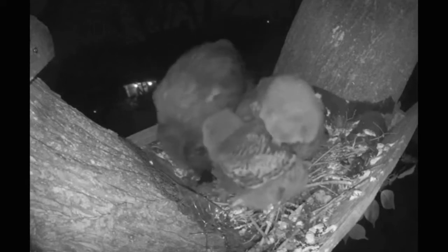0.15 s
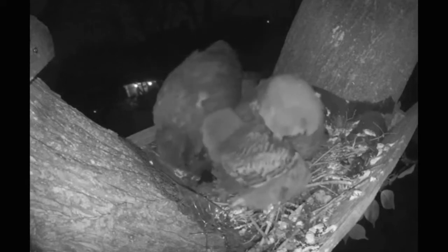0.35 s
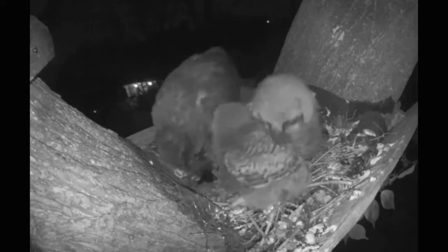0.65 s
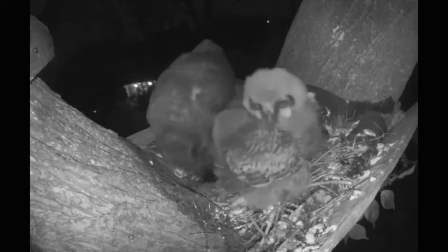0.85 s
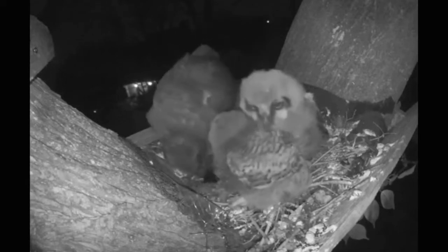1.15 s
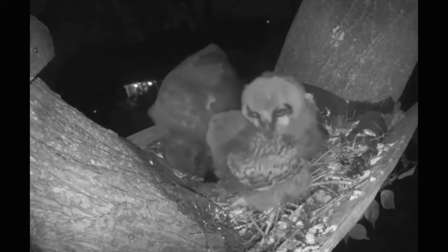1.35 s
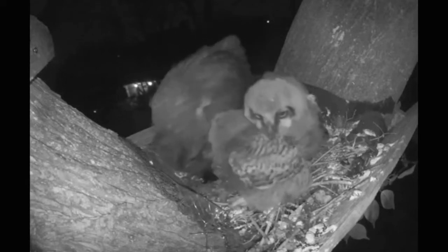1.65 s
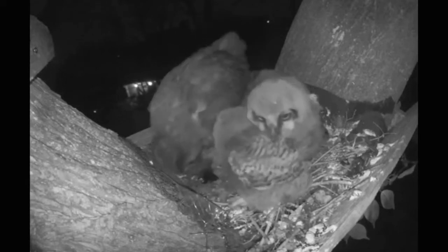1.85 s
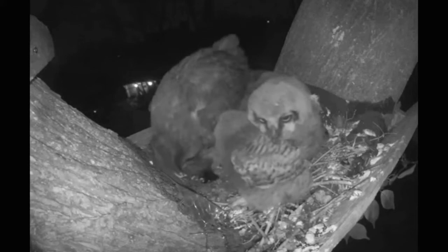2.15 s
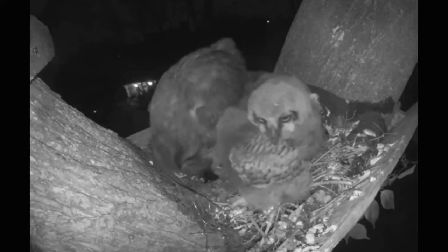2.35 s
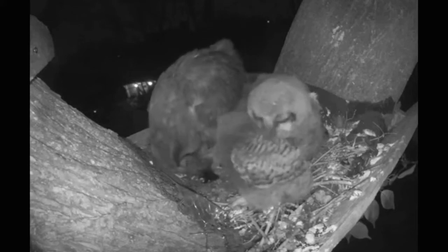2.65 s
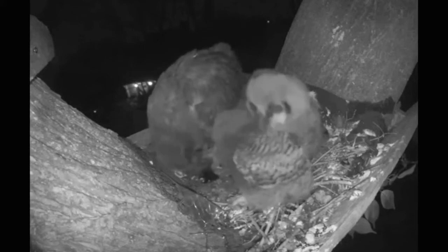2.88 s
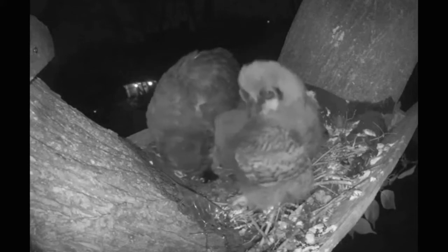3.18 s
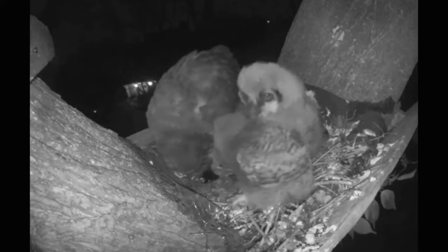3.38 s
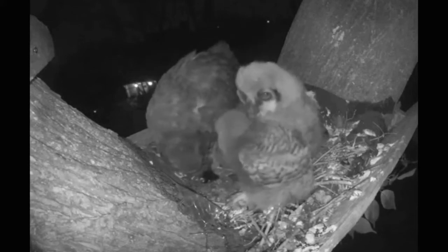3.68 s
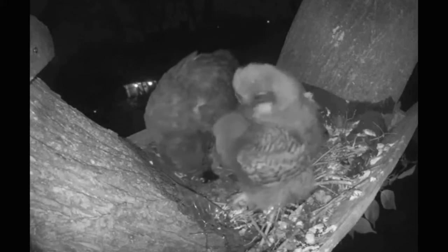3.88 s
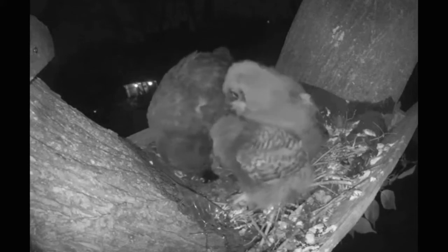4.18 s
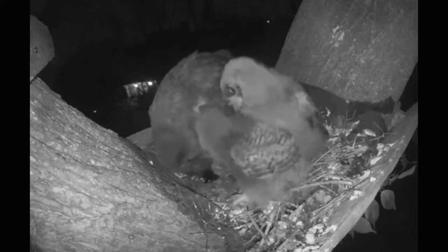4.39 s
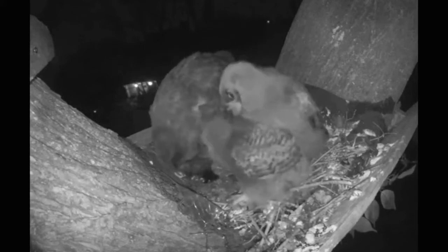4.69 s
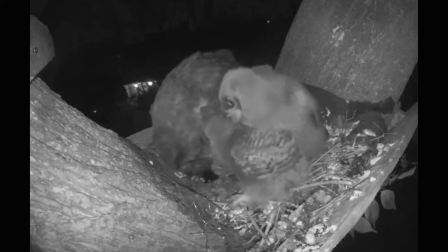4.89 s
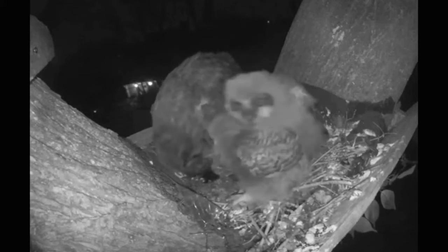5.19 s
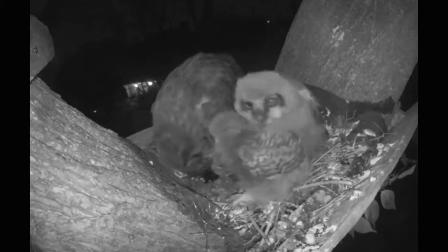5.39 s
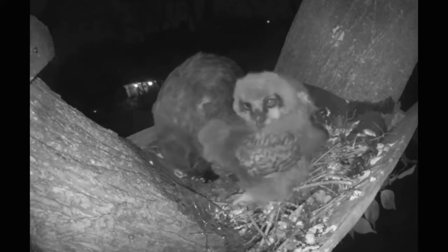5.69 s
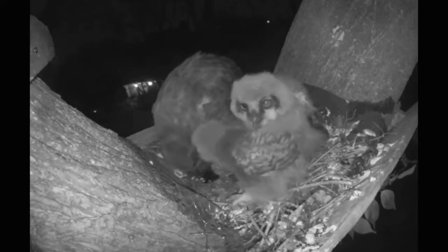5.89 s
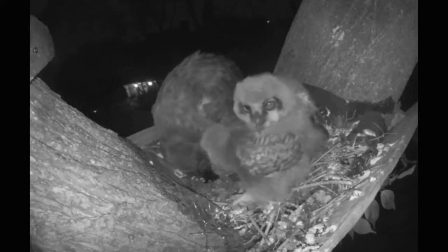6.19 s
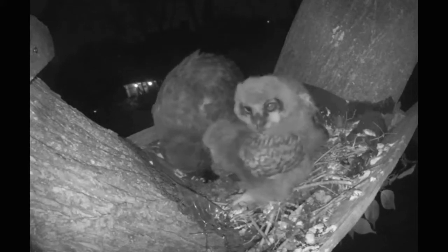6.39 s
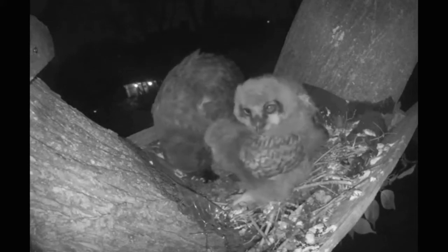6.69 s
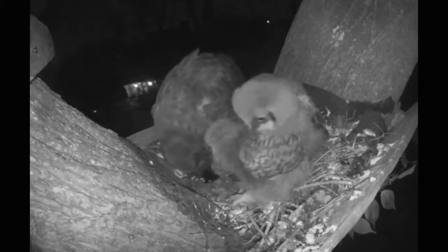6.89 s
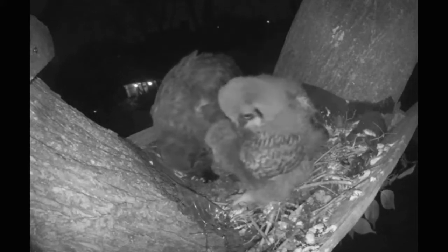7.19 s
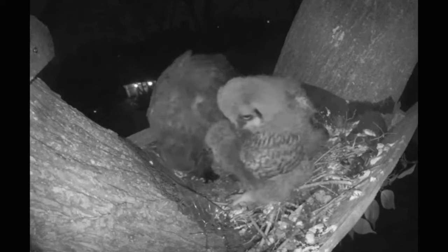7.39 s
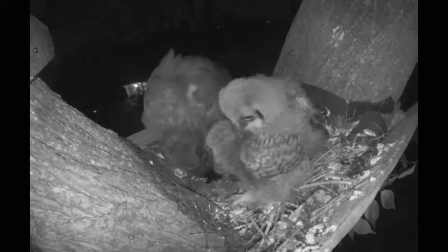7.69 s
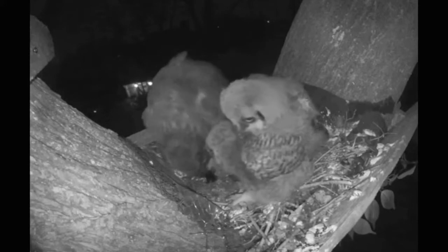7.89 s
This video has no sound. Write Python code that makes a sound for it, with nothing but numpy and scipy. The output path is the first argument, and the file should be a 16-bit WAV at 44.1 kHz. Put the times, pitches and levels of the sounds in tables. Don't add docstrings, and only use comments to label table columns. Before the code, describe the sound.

Owlets beg at night beside a small microphone with little bass. Dull knocks open the scene, followed by dry crackling and a hoarse rising screech. Soft fluttering hoots from an adult surround a shorter, squealing second screech. Several hard nest blows come before a gasp and a third, open, rasping screech. Then it settles into quiet hum, with distant metallic tube tones, slight rustles and last soft thumps.

```python
import sys
import numpy as np
from scipy import signal
from scipy.io import wavfile
from scipy.ndimage import uniform_filter1d

SR = 44100
rng = np.random.default_rng(int(sys.argv[2]) if len(sys.argv) > 2 else 0)


def rack_gain(trim_db):
    fader = np.asarray(trim_db, float)
    return 10 ** (fader / 20)


def waveform_to_disk(signal):
    frames = np.transpose(np.atleast_2d(signal))
    scaled = np.clip(frames, -1, 1) * 32767
    samples = np.round(scaled).astype(np.int16)
    wavfile.write(sys.argv[1], SR, samples)


N = 354960

# f/Hz, level/dB per Hz
NIGHT_SPECTRUM = [(59, -57), (100, -42), (140, -58.5), (228, -16), (372, -1), (422, 0), (658, -1.5),
                  (731, -5.5), (943, -7.5), (1900, -24), (2780, -19), (2960, -20.5), (4060, -21),
                  (6340, -41.5), (15800, -52.5)]
# t/s, level/dB
HUM_SWELL = [(0.3, -63.5), (0.62, -66), (5.28, -65), (5.77, -67.5), (8.04, -62)]
# t/s, f/Hz, level/dB, t60/s
TUBE_PARTIALS = [(2.45, 1860, -87.5, 1.8), (3.25, 1448, -81.5, 4), (3.25, 5626, -77, .4),
                 (3.25, 5071, -79, .4), (3.25, 4269, -81, .5), (3.25, 2729, -83, .8),
                 (4.456, 2386, -74, .9), (4.62, 2745, -79, .7), (4.455, 928, -71, 9),
                 (4.456, 2408, -62, 0.84), (4.62, 2722, -70.5, 0.69), (3.78, 3360, -81, 0.45),
                 (2.89, 3330, -80, 0.54), (2.47, 3330, -79, .6), (5.12, 1835, -83.5, 1.5),
                 (5.723, 2720, -71.5, 0.83), (5.722, 2742, -79, .9), (7.665, 2420, -73, 0.5),
                 (7.665, 2398, -78, .5)]
# peak t/s, peak level/dB, ring f/Hz, width/s
BLOWS = [(.016, -37, 419, .0051), (.0276, -34.5, 481, .0029), (.0607, -28.5, 533, .0028),
         (.0712, -20, 527, .0029), (.0941, -40.5, 405, .0087), (.125, -37.5, 430, .0067),
         (.132, -36.5, 487, .0021), (.1654, -37.5, 425, .0029), (1.138, -41, 450, .0035),
         (1.15, -46, 300, .012), (1.161, -43, 480, .007), (2.388, -37, 560, .0027),
         (2.3943, -25.5, 409, .0044), (2.4145, -29.5, 467, .0033), (2.4432, -34.5, 419, .004),
         (2.4694, -38, 485, .0047), (5.0323, -22.5, 523, .0028), (5.038, -31, 480, .003),
         (5.056, -42, 450, .004), (5.101, -37, 350, .004), (5.123, -40, 350, .004),
         (5.044, -25.5, 414, .0029), (5.067, -23, 427, .005), (5.082, -32, 473, .0049),
         (5.0915, -27, 390, .0046), (5.1155, -34, 470, .0056), (7.8164, -36, 423, .0038),
         (7.828, -35.6, 427, .0039)]
# t/s, peak level/dB, ring f/Hz
LONE_STEPS = [(.1502, -42, 393), (.2124, -46, 483), (.291, -45.5, 426), (.42, -51, 552),
              (.6515, -42.7, 416), (.713, -52, 340), (1.218, -43, 330), (2.069, -51, 598),
              (2.3445, -43.5, 441), (2.523, -52.5, 270), (5.442, -49, 400), (7.575, -52, 346),
              (7.879, -48.5, 414)]
# start t/s, end t/s, peak level/dB
FOOT_SHUFFLES = [
    (0, .058, -41),
    (.078, .12, -43),
    (2.35, 2.385, -46),
    (2.4, 2.5, -47),
    (5.02, 5.125, -44),
    (5.49, 5.545, -52),
    (7.795, 7.815, -49),
]
# t/s, peak level/dB, centre f/Hz
TWIG_SNAPS = [(.0695, -47, 2200), (1.514, -58, 5200), (2.39, -60, 2700), (2.858, -63, 4700),
              (3.24, -60, 3100), (4.737, -58, 3300), (.3601, -58, 2800), (.483, -57, 2640),
              (1.1262, -51, 4110), (1.1596, -52, 3860), (1.1942, -53, 2900), (1.2254, -52, 3200),
              (1.259, -54, 2400), (1.283, -53, 3180), (1.4905, -55, 5500), (1.0007, -52, 3820),
              (1.037, -56, 3600), (1.135, -51, 4600), (1.186, -54, 3000), (1.208, -53, 4400),
              (1.2496, -53, 4860), (1.3739, -53, 4200), (1.4088, -57, 4390), (1.4687, -60, 4720),
              (1.33, -59, 5200), (1.443, -62, 4500), (6.1772, -52, 3800), (6.171, -56, 3900),
              (6.2, -58, 3500), (6.215, -60, 3800), (6.249, -54, 4000), (6.244, -58, 4700),
              (2.0663, -54, 2720), (2.7422, -62, 3980), (2.9801, -58, 2870), (3.1722, -61, 3010),
              (3.5226, -56, 3220), (3.622, -47.5, 2100), (3.6631, -54, 3640), (4.5194, -52.5, 2410),
              (4.7173, -56, 3420), (4.984, -53, 4500), (5.0112, -52, 3290), (5.0223, -53.5, 4490),
              (6.8877, -58, 3860)]
# start t/s, end t/s, centre f/Hz, level/dB
FEATHER_RUSTLES = [(.96, 1.086, 3600, -71.5), (1.085, 1.25, 3900, -68.5), (1.244, 1.348, 3930, -70),
                   (1.361, 1.505, 4100, -78), (2.96, 3.09, 3750, -77), (3.22, 3.34, 4220, -78),
                   (4.488, 4.573, 4500, -77.5), (4.692, 4.763, 3620, -68.5), (4.8, 4.866, 3760, -76),
                   (7.918, 8.04, 3550, -72.5), (3.78, 3.874, 3800, -75), (4.188, 4.25, 4040, -80.5),
                   (0, 8.04, 4400, -86.5)]
# start t/s, end t/s, f/Hz, fundamental level/dB
HOOT_PULSES = [(2.78, 2.865, 304, -48), (2.862, 2.898, 240, -76), (3.116, 3.187, 294.8, -52.5),
               (3.183, 3.203, 263, -76), (3.205, 3.279, 300.7, -50), (3.271, 3.349, 292, -52.5),
               (3.338, 3.394, 276.6, -55), (3.389, 3.462, 268.8, -57.5), (3.452, 3.506, 249, -69),
               (4.284, 4.312, 255, -68), (4.31, 4.346, 268, -57), (4.335, 4.411, 290, -51.5),
               (4.402, 4.479, 295.3, -51), (4.473, 4.546, 276.6, -53), (4.541, 4.611, 264.7, -58),
               (4.615, 4.672, 247.4, -70), (5.125, 5.19, 303, -54), (5.17, 5.24, 290, -55),
               (5.237, 5.305, 272, -56)]
# start t/s, end t/s, first f/Hz, last f/Hz, level/dB
NARROW_WHEEZES = [
    (.275, .364, 6500, 6270, -81.5),
    (.361, .516, 2750, 2780, -71.5),
    (.361, .512, 3560, 3580, -73),
    (.48, .52, 4830, 4500, -79),
    (.666, .69, 5600, 4700, -79),
    (6.145, 6.21, 5100, 6900, -77),
    (6.19, 6.25, 5800, 5000, -78),
    (3.868, 3.898, 5300, 5200, -63),
    (3.87, 3.905, 6100, 6100, -69),
    (4.613, 4.66, 5320, 5370, -78),
]
# start t/s, end t/s, first f/Hz, last f/Hz, level/dB
OPEN_GASPS = [
    (.278, .33, 4350, 4600, -74.5),
    (6.125, 6.19, 3200, 4000, -67),
    (6.19, 6.26, 3670, 4020, -77),
]
# start t/s, length/s, first f/Hz, last f/Hz, level/dB
SHORT_PEEPS = [(3.867, .03, 2980, 3180, -35.5), (3.83, .024, 1080, 1200, -50),
               (6.258, .026, 2850, 2930, -55), (6.212, .024, 5750, 5480, -70),
               (6.222, .04, 6800, 6800, -79), (6.184, .018, 6050, 5600, -72), (.25, .014, 3850, 3550, -62),
               (.264, .014, 3550, 3350, -67), (1.507, .01, 2600, 2900, -55), (1.513, .01, 3300, 3700, -50),
               (.681, .016, 4200, 3550, -57), (1.515, .125, 3560, 3670, -56)]
# t/s, f/Hz, level/dB
WHISTLES = [
    [(3.929, 2893, -40), (3.95, 2790, -43), (4.02, 2806, -41), (4.045, 2717, -42.5), (4.06, 2740, -36),
     (4.082, 2790, -31), (4.108, 2730, -37), (4.115, 2800, -47), (4.13, 2900, -50)],
    [(3.94, 3400, -52), (3.955, 3520, -46), (3.98, 3480, -48), (4.0, 3400, -52)],
    [(.5, 4840, -83), (.55, 3990, -73), (.58, 3750, -74), (.615, 4150, -74), (.635, 3750, -72),
     (.68, 3780, -72)],
    [(4.03, 3750, -43), (4.065, 3530, -41), (4.098, 3610, -41), (4.118, 3844, -38), (4.14, 3810, -40),
     (4.155, 3400, -42), (4.17, 2650, -46), (4.19, 1950, -62)],
    [(3.93, 5600, -62), (4.02, 5560, -60), (4.09, 5450, -54), (4.135, 5400, -58)],
    [(1.6, 3600, -52), (1.65, 3850, -43), (1.7, 3700, -44), (1.76, 3700, -45), (1.8, 3800, -38),
     (1.84, 3850, -35)],
    [(6.41, 4000, -50), (6.44, 4000, -44), (6.49, 3900, -43), (6.51, 3950, -38), (6.55, 3950, -38),
     (6.575, 4050, -33)],
]
# t/s, f/Hz, level/dB
HOARSE_BANDS = [
    [(1.6, 2850, -52), (1.65, 2800, -44), (1.75, 2800, -48), (1.85, 2850, -37), (1.872, 2700, -39),
     (1.895, 2400, -60)],
    [(4.015, 3150, -44), (4.05, 3050, -41), (4.08, 3000, -43), (4.11, 3120, -41), (4.15, 3150, -44),
     (4.162, 2700, -52)],
    [(3.903, 3700, -56), (3.92, 3880, -52), (3.94, 3850, -54), (3.98, 3850, -54), (4.025, 3900, -48)],
    [(3.895, 3000, -52), (3.915, 3080, -51), (3.93, 3100, -48), (3.95, 3150, -50)],
    [(6.272, 4200, -63), (6.29, 4400, -57), (6.32, 4000, -53), (6.36, 3800, -51), (6.4, 3850, -49)],
    [(6.123, 3650, -64), (6.135, 3760, -52), (6.143, 3800, -59), (6.15, 3720, -56), (6.163, 3580, -62),
     (6.184, 3550, -66)],
    [(6.3, 2750, -62), (6.35, 2750, -55), (6.41, 2800, -57), (6.44, 2900, -48), (6.46, 2850, -52)],
]
JITTERS = [18, 110, 110, 18, 120, 200, 150, 150, 90, 120, 80, 160, 90, 150]
# top t/s, top f/Hz, level/dB, lead-in/s, jitter/Hz
END_YELPS = [
    (1.853, 3900, -25.5, .012, 35),
    (6.597, 4050, -25.5, .022, 110),
    (4.158, 5300, -53, .02, 130),
]
# t/s, level/dB
EFFORTS = [
    [(1.508, -63), (1.55, -55), (1.64, -40), (1.70, -38), (1.76, -37), (1.80, -32.5), (1.86, -30.5),
     (1.88, -41), (1.905, -78)],
    [(3.864, -56), (3.88, -52), (3.94, -52.5), (4.03, -39), (4.08, -35.5), (4.15, -36), (4.168, -42),
     (4.192, -72)],
    [(6.262, -70), (6.275, -55.5), (6.35, -47.5), (6.405, -45), (6.435, -40.5), (6.56, -34), (6.6, -33),
     (6.622, -43), (6.65, -70)],
]
# f/Hz, level/dB per Hz
THROAT_SPECTRA = [
    [(120, -72), (200, -35), (278, -23), (316, -25), (423, -15.5), (610, -18.5), (1180, -22), (1790, -32),
     (2780, -3.5), (3650, 1.5), (5260, -14.5), (6090, -47), (7720, -31.5), (11300, -53.5), (15800, -41.5)],
    [(120, -76), (200, -50), (328, -28), (527, -14.5), (980, -30.5), (1960, -25), (2580, -18.5), (2780, -1),
     (3330, -7.5), (3650, -11), (4980, -19), (5660, -19), (6430, -43), (12400, -47), (15800, -48)],
    [(120, -74.5), (200, -45), (359, -21.5), (577, -11), (621, -20), (1180, -21.5), (1660, -37),
     (2110, -26), (2930, -7), (3860, -0.5), (5170, -11), (6550, -46), (8940, -34), (12200, -59.5),
     (15800, -44)],
]
RASP_LEVELS = [.5, -3, 0]
BEAK_GAPES = [.02, .04, .12]
TOP_LIFTS = [4.5, 1.5, 6.5]


def evened(x):
    return x / np.sqrt(np.mean(x ** 2) + 1e-20)


def read(points, hz):
    f, value = np.transpose(points)
    return np.interp(np.log(hz + 1), np.log(f + 1), value)


def spread(rows):
    s, *columns = np.transpose(rows)
    t = np.arange(s[0], s[-1], 1 / SR)
    return [t] + [np.interp(t, s, c) for c in columns]


def add(mix, s, sound):
    part = mix[max(round(s * SR), 0):][:len(sound)]
    part += sound[:len(part)]


def wander(length, hz):
    pole = np.exp(-2 * np.pi * hz / SR)
    two_poles = np.convolve([1, -pole], [1, -pole])
    return evened(signal.lfilter([1], two_poles, rng.standard_normal(length + 2000))[2000:])


def scatter(start, end, gap):
    s = np.arange(start, end - gap / 2, gap)
    chance = rng.uniform(-1, 1, (len(s), 4))
    return zip(s + gap * (.5 + .4 * chance[:, 0]), *chance[:, 1:].T)


def colour(x, gain_db):
    hz, t, z = signal.stft(x, SR, nperseg=256, noverlap=192)
    shaped = z * rack_gain(gain_db(hz[:, None], t[None]))
    return signal.istft(shaped, SR, nperseg=256, noverlap=192)[1][:len(x)]


def patchwork(length, hz_bins, frames):
    grain = rng.standard_normal((length // 64 + 9, 129)).T
    return evened(uniform_filter1d(uniform_filter1d(grain, hz_bins, 0), frames, 1))


def night():
    frames, hz = N // 256 + 5, np.fft.rfftfreq(1024, 1 / SR)
    a, b, patches = rng.standard_normal((frames, 513, 3)).T
    patches = evened(uniform_filter1d(uniform_filter1d(patches, 16, 0), 6, 1))
    patchy_db = 1.7 * patches * (hz[:, None] < 7000)
    swell_db = np.interp(np.arange(frames) * 256 / SR, *np.transpose(HUM_SWELL))
    low = 1 / (1 + (hz[:, None] / 1600) ** 4)
    gain_db = read(NIGHT_SPECTRUM, hz)[:, None] + patchy_db + low * (swell_db - np.median(swell_db))
    noise = signal.istft((a + 1j * b) * rack_gain(gain_db), nperseg=1024, noverlap=768)[1][:N]
    return rack_gain(-65) * evened(noise)


def tube(hz, db, t60):
    t = np.arange(round(t60 * SR / 2)) / SR
    return rack_gain(db - 60 * t / t60) * np.sqrt(2) * np.sin(2 * np.pi * hz * t) * np.minimum(t / .004, 1)


def hollow(x):
    t = np.arange(9000) / SR
    decay = rack_gain(-60 * t / 0.059) + rack_gain(-38 - 60 * t / .35)
    taps = rng.standard_normal(9000) * decay * (t > .002)
    return x + rack_gain(-15) * signal.fftconvolve(x, taps / np.linalg.norm(taps))[:N]


def bump(db, hz, width, twist):
    t = np.arange(-500, 900) / SR
    shape = np.exp(-.5 * (t / (0.39 * width * np.where(t > 0, 1.15, .9))) ** 2)
    sagging = 1 - .04 * np.tanh(t / width)
    wave = shape * np.cos(2 * np.pi * (hz * t * sagging + twist))
    knock = shape ** 3 * np.cos(2 * np.pi * (1.87 * hz * t + 3 * twist))
    thump = wave + knock * rack_gain(-16.5 + 0.84 * (db + 20.5))
    return rack_gain(db) * (thump - shape * thump.sum() / shape.sum())


def feet():
    width_s, gap_s = .0042, .009
    rows = BLOWS + [(*row, width_s) for row in LONE_STEPS]
    for start, end, db in FOOT_SHUFFLES:
        for s, a, b, c in scatter(start, end, gap_s):
            rows.append((s, db + 4 * a, 400 * (1 + .3 * b), width_s * (.9 + .3 * c)))
    out = np.zeros(N + 500)
    for s, *row in rows:
        add(out, s, bump(*row, rng.random()))
    return out[500:]


def snap(db, hz):
    t = np.arange(600) / SR
    decay = np.exp(-t / 0.002) + .12 * np.exp(-t / .005)
    crack = rng.standard_normal(600) * decay * np.minimum(t / .0006, 1)
    wide = signal.iirpeak(hz, 1.1, SR)
    body = signal.lfilter(*wide, signal.lfilter(*wide, crack))
    body = signal.sosfilt(signal.butter(6, min(1.7 * hz, 6300), fs=SR, output="sos"), body)
    crack = body + rack_gain(-34) * signal.lfilter(*signal.iirpeak(10500, 4, SR), crack)
    return rack_gain(db) * crack / abs(crack).max()


def crackle(mix):
    for s, a, b, _ in scatter(1.0, 1.48, .02):
        add(mix, s, snap(-67 + 4.5 * a, 4300 * (1 + .25 * b)))


def rustle(length, centre_hz, db):
    count = round(length * SR)
    grains = rng.standard_normal(count) * rack_gain(2.6 * wander(count, 150) + 2.2 * wander(count, 25))
    patchy_db = 3.5 * patchwork(count, 7, 8)

    def gain_db(hz, s):
        body = -20 * np.log2((hz + 1) / centre_hz) ** 2 - 12 / (1 + (7200 / (hz + 1)) ** 16)
        air = -27 - 60 * np.log2((hz + 1) / 10500) ** 2
        return np.maximum(body, air) + patchy_db[:, :s.size]
    return rack_gain(db) * evened(colour(grains, gain_db)) * signal.windows.tukey(count, min(0.053 / length, .9))


def hoots():
    first, octave, push = np.zeros((3, N))
    for start, end, hz, first_db in HOOT_PULSES:
        octave_db = -52 + .45 * (first_db + 52)
        octave_db += 3 * (start > 5.05)
        arch = signal.windows.tukey(round((end - start + 0.016) * SR), .85)
        add(first, start - .016, rack_gain(first_db) * arch)
        add(octave, start - .01, rack_gain(octave_db) * arch)
        add(push, start, np.sin(np.linspace(0, np.pi, round((end - start) * SR))) ** .5)
    start, end, hz = np.transpose(HOOT_PULSES)[:3]
    pitch = np.interp(np.arange(N) / SR, (start + end) / 2, hz)
    pitch *= 1 - 0.085 * (1 - np.minimum(push, 1))
    turn = 2 * np.pi * np.cumsum(pitch + 5 * wander(N, 40)) / SR
    low = first * rack_gain(-1.2 + wander(N, 60)) * np.sin(turn)
    high = octave * rack_gain(1.7 * wander(N, 50)) * np.sin(2 * turn + 0.93)
    return np.sqrt(2) * (low + high)


def wheeze(length, first_hz, last_hz, octaves, db):
    count = round(length * SR)
    air = rng.standard_normal(count) * rack_gain(1.5 * wander(count, 80))

    def gain_db(hz, s):
        glide = np.interp(s, [0, length], [first_hz, last_hz])
        return -6 * (np.log2((hz + 1) / glide) / np.minimum(octaves, .32)) ** 2
    return rack_gain(db) * evened(colour(air, gain_db)) * signal.windows.tukey(count, .12)


def voice(rows, fuzz_hz):
    t, hz, db = spread(rows)
    turn = 2 * np.pi * np.cumsum(hz + fuzz_hz * wander(len(t), 300)) / SR
    shimmer = rack_gain((0.86 + fuzz_hz / 80) * np.minimum(wander(len(t), 230), 1.8))
    smear = 1.1 * wander(len(t), 400)
    tone = np.sin(turn) + rack_gain(-29 + .6 * (db + 27)) * np.sin(2 * turn + smear)
    tone += rack_gain(-46) * np.sin(3 * turn + smear) + rack_gain(-43) * np.sin(4 * turn + 1.4 * smear)
    return rack_gain(db) * evened(shimmer * tone) * signal.windows.tukey(len(t), .08)


def peep(length, first_hz, last_hz, db):
    attack = .35
    top_hz = first_hz + attack * (last_hz - first_hz)
    rows = [(0, first_hz, db - 9), (attack * length, top_hz, db), (length, last_hz, db - 10)]
    return voice(rows, .33 * length * first_hz)


def yelp(top_s, top_hz, db, lead_s, jitter_hz):
    rows = [(top_s - lead_s, .995 * top_hz, db - 3), (top_s, top_hz, db),
            (top_s + .015, .89 * top_hz, db), (top_s + .05, .54 * top_hz, db - 33)]
    return top_s - lead_s, voice(rows, jitter_hz)


def beak_of(rows, wide, bright_db):
    t, effort_db = spread(rows)
    gape = np.exp(-(t - t[0]) / .12)
    closing = np.clip(1 - (t[-1] - t) / .05, 0, 1)
    beak = 1 + wide * gape - (1 - .62) * closing ** 1.5
    follow_db = .2 * (effort_db - effort_db.max()) * (1 - closing)
    return np.transpose([t, effort_db, beak, bright_db + 5 * gape ** 4 + follow_db])


def screech(rows, throat, rasp_db):
    t, effort_db, beak, bright_db = spread(rows)
    chop_db = 2.5 * np.clip(wander(len(t), 320), -2.5, 1.7) + .7 * wander(len(t), 40)
    airflow = rng.standard_normal(len(t)) * rack_gain(chop_db)
    flits_db = 2.2 * patchwork(len(t), 3, 9)

    def gain_db(hz, s):
        opening, lift_db = np.interp(s + t[0], t, beak), np.interp(s + t[0], t, bright_db)
        moved, still = read(throat, hz / opening), read(throat, hz + 0 * s)
        middle = np.minimum(moved, still + 1.5)
        body = np.where(hz < 1400, still, np.where(hz < 2500, middle, moved))
        top = lift_db * (hz > 6300 * opening) + 5.5 * np.exp(-((hz / opening - 14200) / 1500) ** 2)
        return body + top + flits_db[:, :s.size] * (hz < 6000)
    shaped = colour(airflow, gain_db)
    power = uniform_filter1d(shaped ** 2, 2000)
    return shaped / np.sqrt(power) * rack_gain(effort_db + rasp_db) * signal.windows.tukey(len(t), .02)


def scene():
    near, far = hoots(), night() + feet()
    for s, *row in TUBE_PARTIALS:
        add(far, s, tube(*row))
    for s, *row in TWIG_SNAPS:
        add(near, s, snap(*row))
    crackle(near)
    for start, end, *row in FEATHER_RUSTLES:
        add(near, start, rustle(end - start, *row))
    for table, octaves in (NARROW_WHEEZES, .12), (OPEN_GASPS, .31):
        for start, end, first_hz, last_hz, db in table:
            add(near, start, wheeze(end - start, first_hz, last_hz, octaves, db))
    for start, *row in SHORT_PEEPS:
        add(near, start, peep(*row))
    for rows, fuzz_hz in zip(WHISTLES + HOARSE_BANDS, JITTERS):
        add(near, rows[0][0], voice(rows, fuzz_hz))
    for row in END_YELPS:
        add(near, *yelp(*row))
    for rows, throat, rasp_db, *beak in zip(EFFORTS, THROAT_SPECTRA, RASP_LEVELS, BEAK_GAPES, TOP_LIFTS):
        add(near, rows[0][0], screech(beak_of(rows, *beak), throat, rasp_db))
    return (hollow(near) + far)[None]


def low_pass(x):
    return signal.sosfilt(signal.butter(12, 15900, fs=SR, output="sos"), x)


def record(dry):
    noisy = dry + rack_gain(-95.5) * rng.standard_normal(dry.shape)
    cut = signal.sosfilt(signal.butter(10, 200, "highpass", fs=SR, output="sos"), noisy)
    cut = signal.oaconvolve(cut, signal.firwin(511, 15850, fs=SR)[None], "same")
    return low_pass(cut)


dry = scene()
out = record(dry)
waveform_to_disk(out)
```